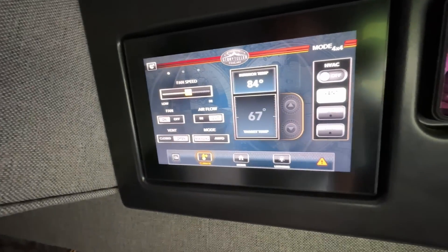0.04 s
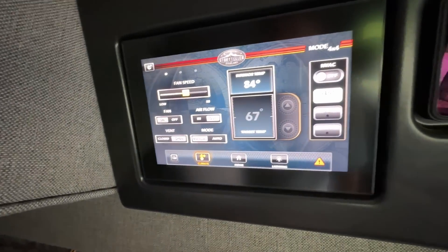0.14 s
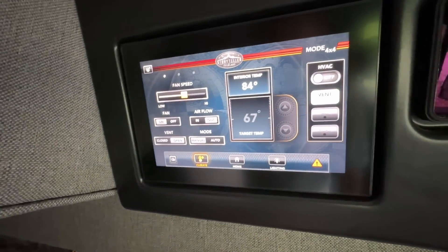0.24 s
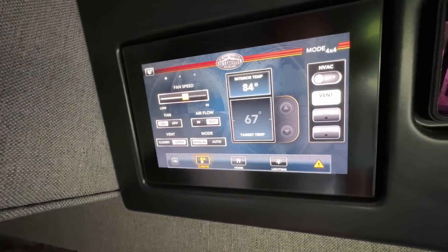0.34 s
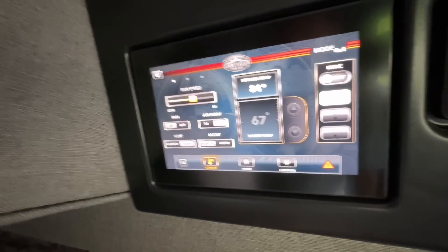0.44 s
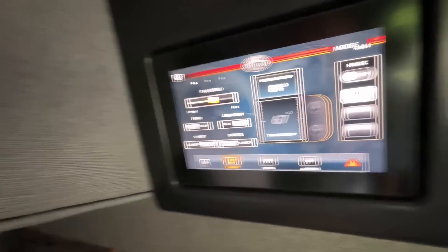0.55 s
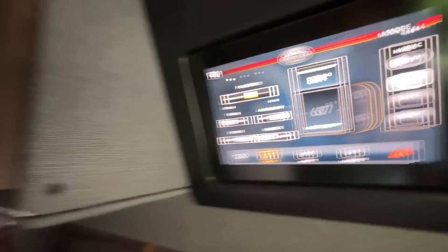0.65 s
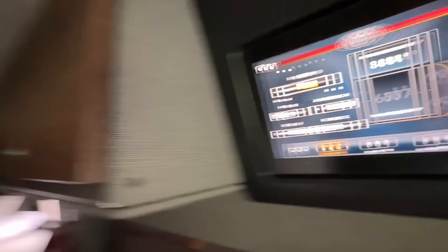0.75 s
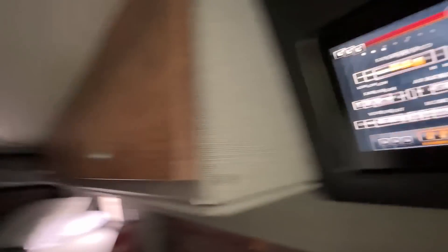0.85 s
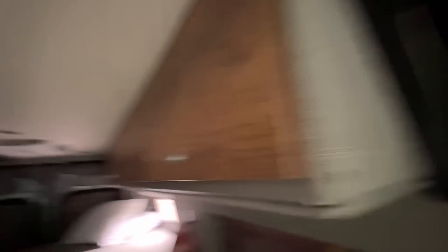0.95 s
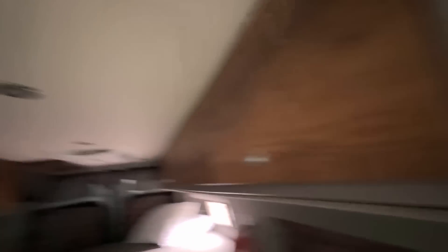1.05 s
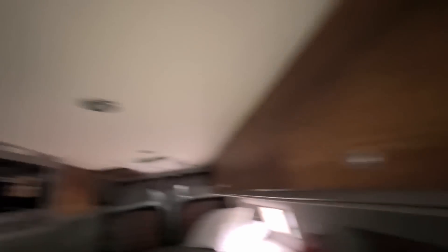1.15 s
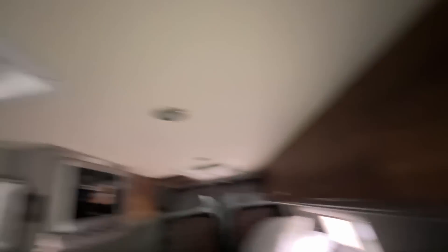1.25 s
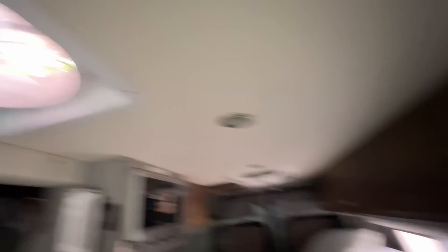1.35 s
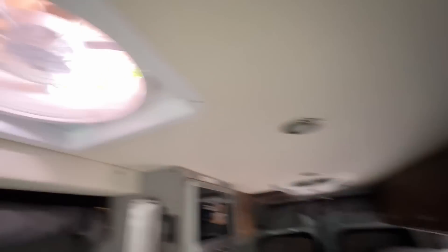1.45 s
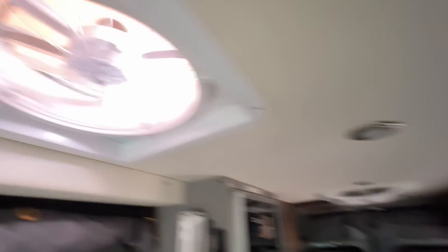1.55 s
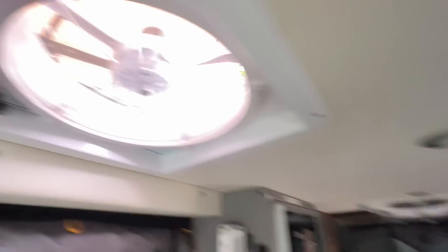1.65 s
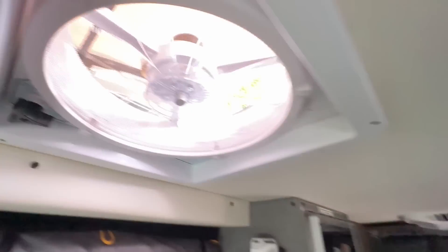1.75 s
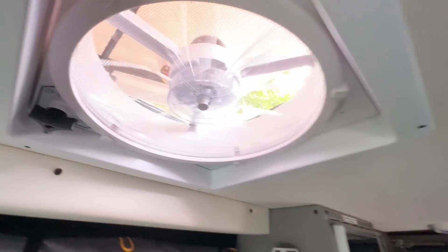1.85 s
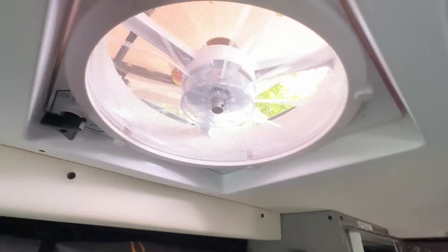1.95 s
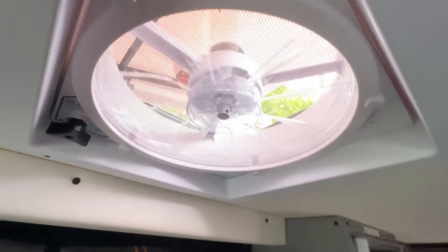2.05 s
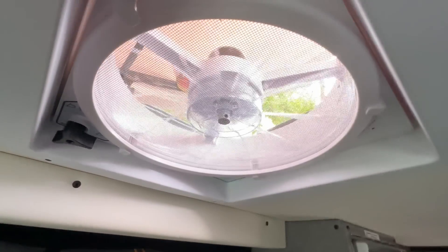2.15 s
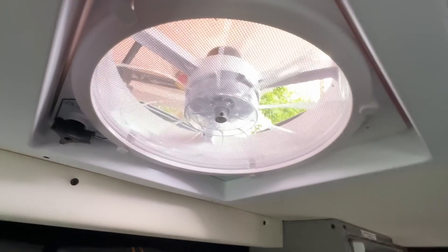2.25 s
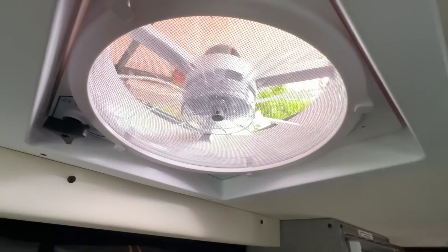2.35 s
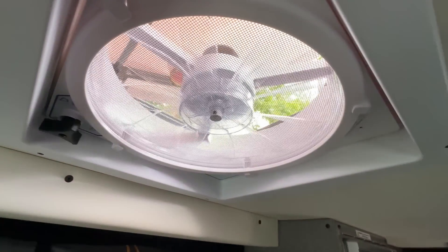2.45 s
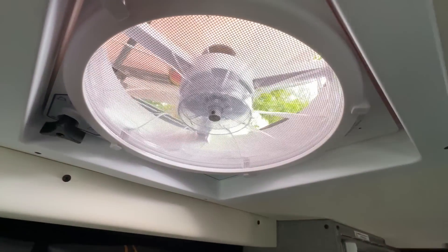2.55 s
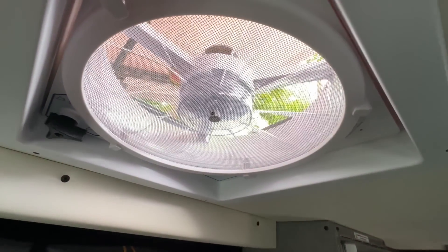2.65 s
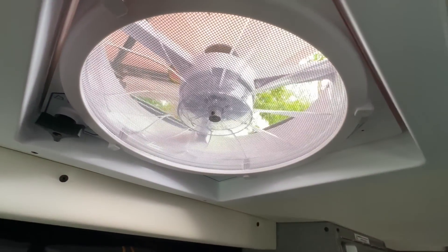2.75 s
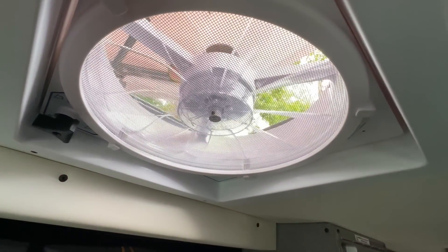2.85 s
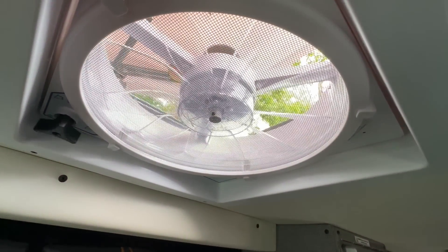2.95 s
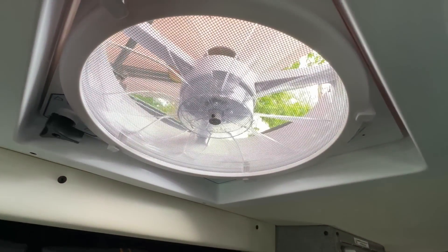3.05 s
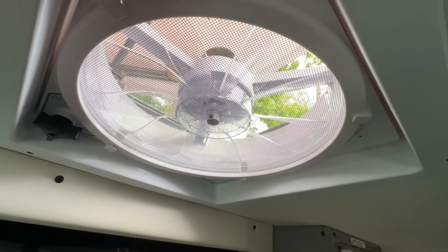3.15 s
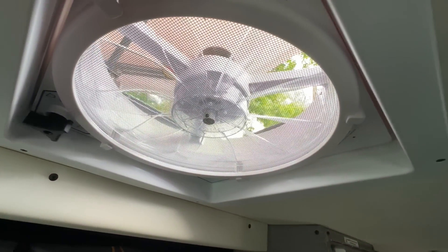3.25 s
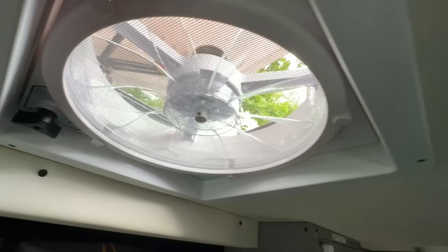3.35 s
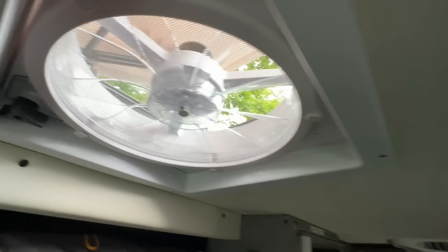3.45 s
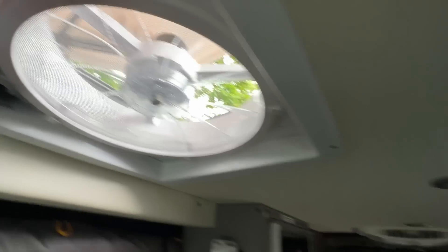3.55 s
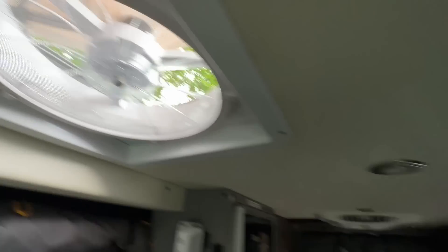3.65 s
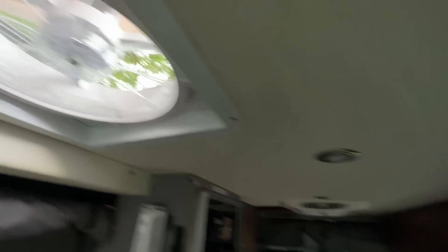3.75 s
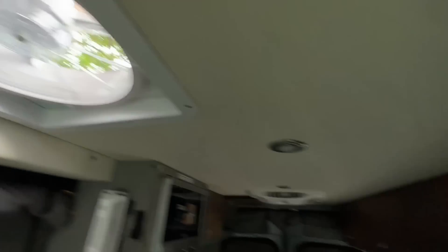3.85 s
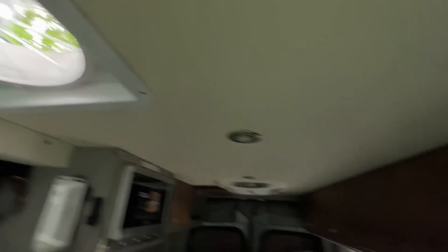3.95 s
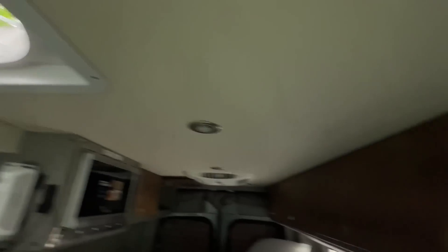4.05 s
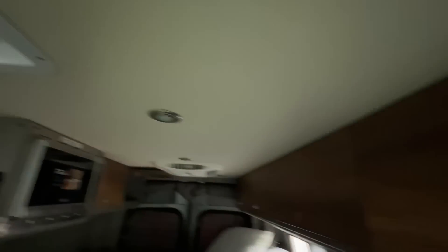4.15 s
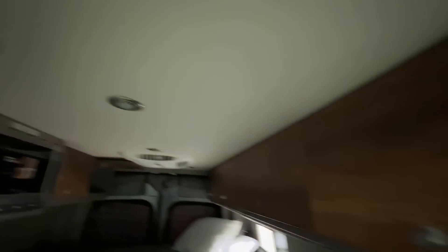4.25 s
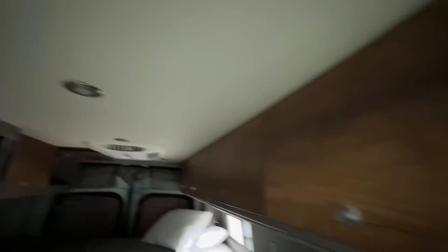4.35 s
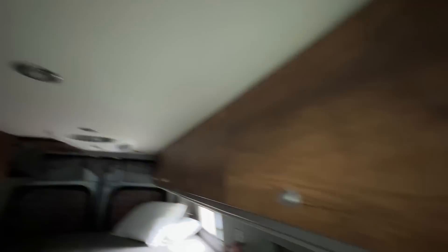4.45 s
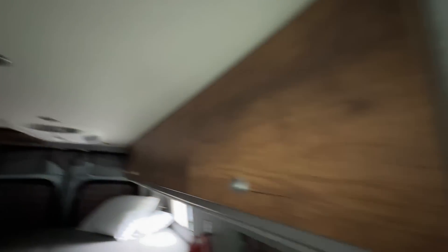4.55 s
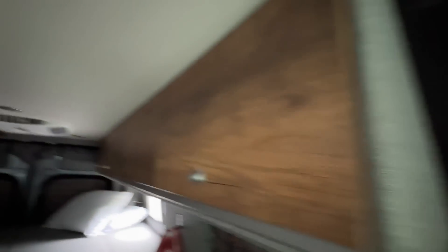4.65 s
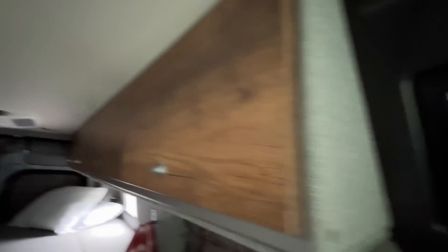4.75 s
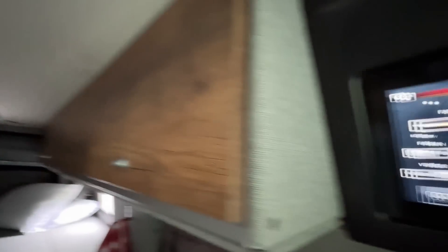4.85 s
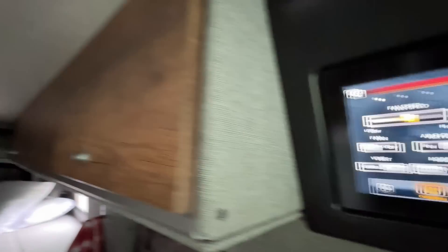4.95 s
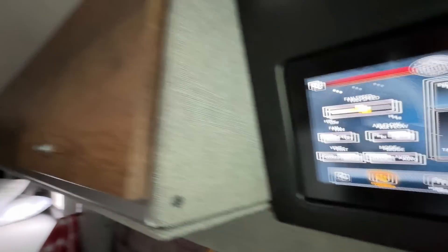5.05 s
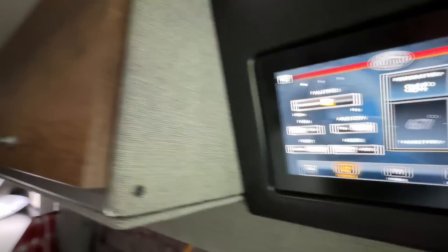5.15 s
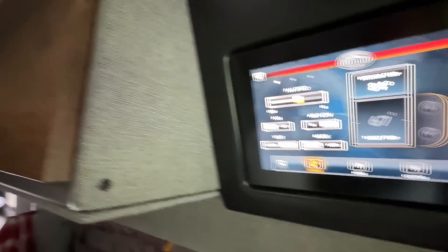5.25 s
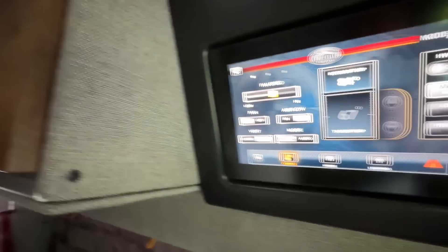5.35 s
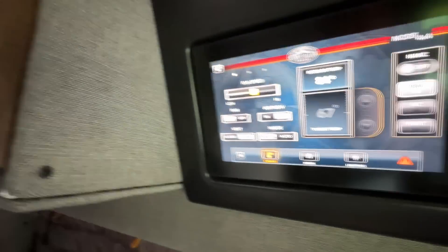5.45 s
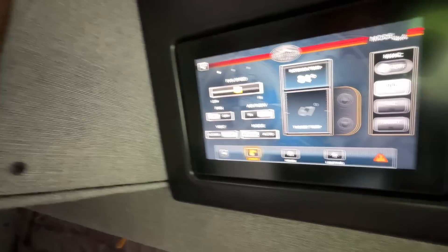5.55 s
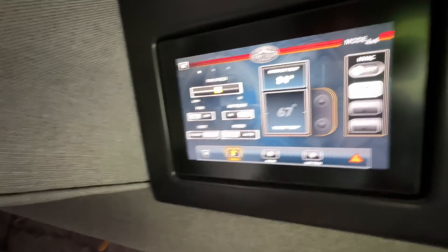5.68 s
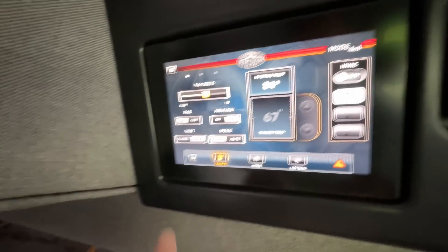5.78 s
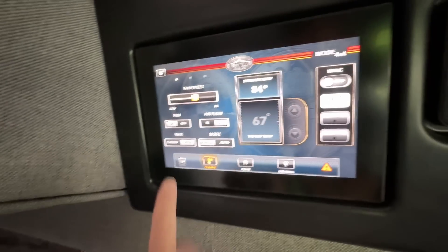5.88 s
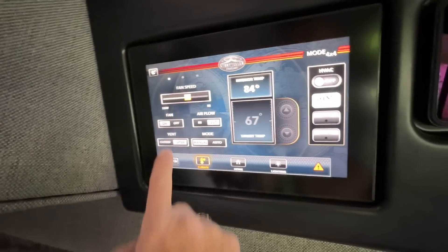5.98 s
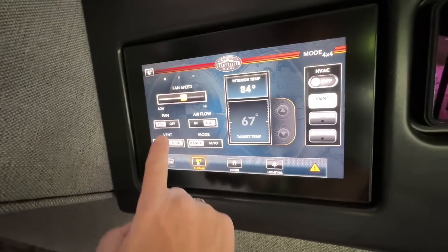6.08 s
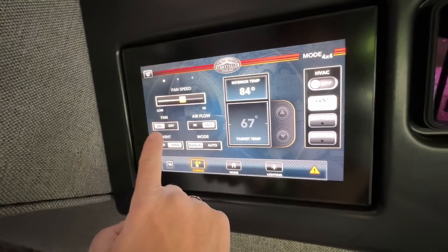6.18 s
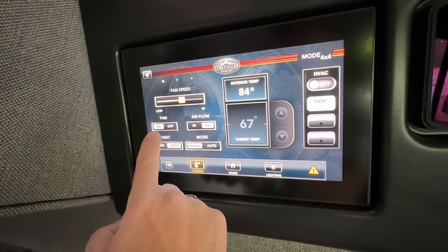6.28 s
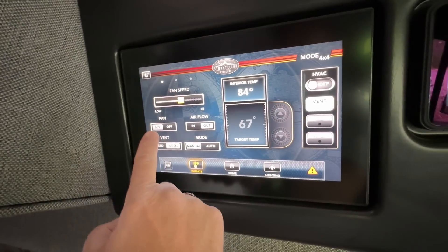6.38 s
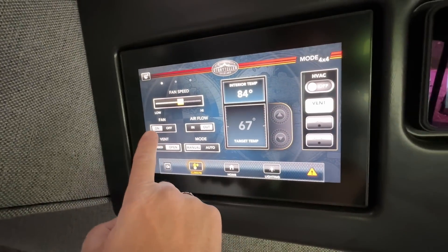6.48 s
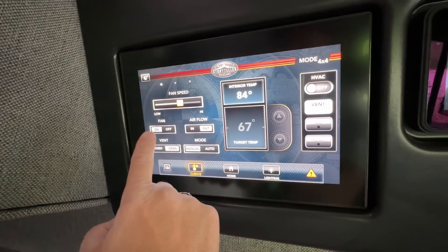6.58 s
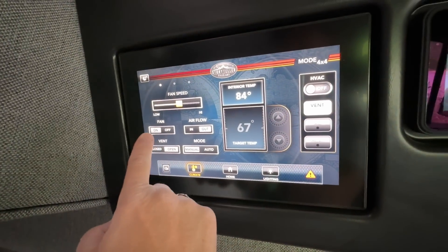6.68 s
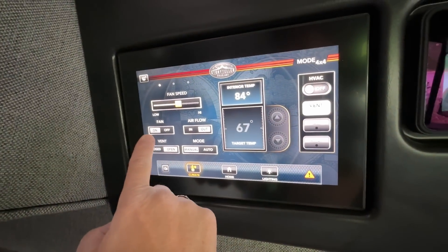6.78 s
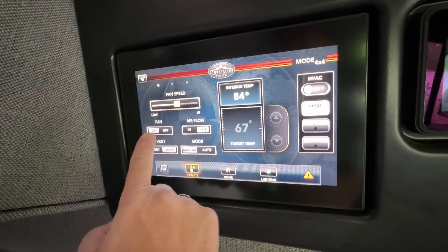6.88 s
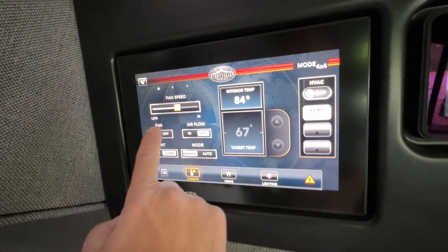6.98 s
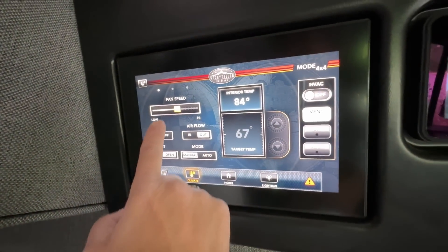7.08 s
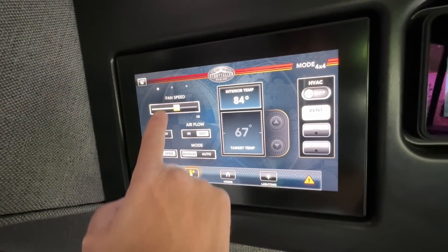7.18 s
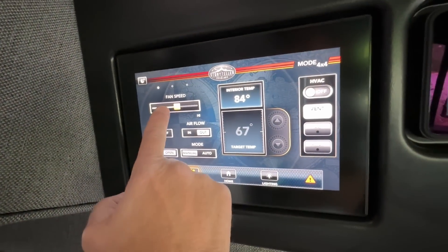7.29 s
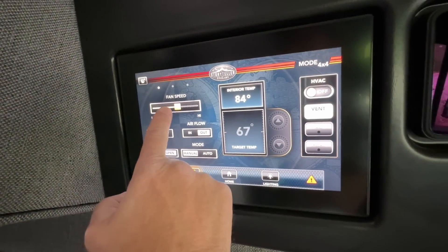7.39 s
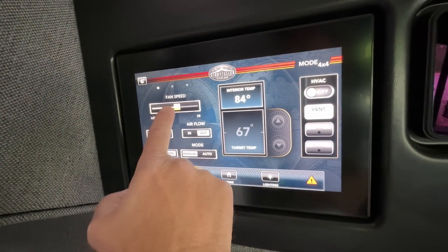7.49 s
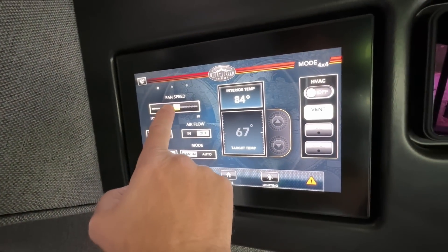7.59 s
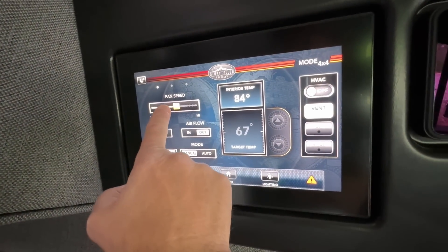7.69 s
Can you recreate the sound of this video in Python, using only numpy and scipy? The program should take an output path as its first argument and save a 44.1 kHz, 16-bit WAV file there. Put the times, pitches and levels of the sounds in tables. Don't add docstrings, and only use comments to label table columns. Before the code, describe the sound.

A steady motor whine around 1.25 kilohertz, with rough brush and gear noise in a plastic housing, plays over soft low cabin rumble. It is thin at first, fuller after half a second, strongest from about 1.5 to 3.5 seconds close to the vent, then duller. After 6.6 seconds it runs down with a descending whine, light chatter and small handling sounds.

```python
import sys
import numpy as np
from scipy import signal
from scipy.fft import rfft, irfft, next_fast_len
from scipy.io import wavfile
from scipy.ndimage import uniform_filter1d

SR = 44100
rng = np.random.default_rng(int(sys.argv[2]) if len(sys.argv) > 2 else 0)


def volts_from_decibels(level):
    exponent = np.asarray(level, float) / 20
    return 10 ** exponent


def materialize(psi):
    bounded = np.clip(np.atleast_2d(psi).T, -1, 1)
    quanta = np.round(bounded * 32767).astype(np.int16)
    wavfile.write(sys.argv[1], SR, quanta)


N = 340578
STEP = 32
SLOTS = 12
SWITCH_OFF_S = 6.642
LEFT_RIGHT = np.array([[1], [-1]])

# t/s, left lags right/ms, direct share/0-1, left-right level/dB
AIM = [(0, -0.28, 0.15, -7.5), (.8, -0.4, 0.39, -11.5), (1.154, -0.34, 0.06, -6), (1.497, 0.3, 0.45, -14),
       (1.701, 0.38, 0.28, -19), (3.55, 0.44, 0.25, -16), (3.749, 0.24, 0.1, -10), (4.0, -0.44, 0.12, -13),
       (4.151, -0.39, 0.1, -7), (5.2, -0.32, 0.18, -10.5), (6.499, -.28, 0.11, -11.5),
       (6.849, -0.29, 0.1, -10.5), (7.2, -0.29, 0.12, -15), (7.72, -0.26, 0.02, -14)]
# start/s, end/s
BASS_OPENS_S = (0.49, 0.78)
# f/Hz, level/dB
TREBLE_RESPONSE = [(20, 0), (7500, 0), (8300, -3), (9000, -9), (9400, -24), (9800, -9), (12300, 0),
                   (12600, -55), (13700, -55), (14000, -14), (14600, -1), (15150, -1), (15500, -12),
                   (15900, -45), (21000, -60)]
# f/Hz, width/Hz, level at the wall/dB, level facing the vent/dB
LEFT_COLOUR = [(550, 160, 1.5, -3), (1660, 200, 0, -1), (2000, 380, 0.5, -0.5), (2490, 410, 1.5, 4),
               (3310, 130, 0.5, 7.5), (4140, 600, -5.5, -6), (4940, 770, -3, -0.5), (6900, 640, 0.5, -0.5),
               (7650, 730, 2.5, 2)]
RIGHT_COLOUR = [(726, 470, 1, -4), (1630, 260, 4, 2), (1900, 410, 0.5, -4.5), (2310, 350, 1, 1),
                (3220, 500, 0, -2), (4390, 270, -3.5, 1), (5260, 660, 2.5, -3.5), (6070, 400, -1, -1),
                (7050, 250, 1, -0.5), (8100, 1200, -4.5, -4.5)]
# t/s, length/s, f/Hz, width/Hz, level/dB
BAND_PATCHES = [(.25, .3, 1700, 500, -1), (.95, 0.16, 3450, 300, -1), (1.07, .25, 1840, 500, -6),
                (2.4, 0.36, 1920, 270, -6), (4.4, .4, 4500, 180, -10), (4.7, 0.17, 1770, 350, -7.5),
                (4.9, 0.084, 2100, 250, -4), (4.6, 0.34, 3500, 200, -2), (5.62, 0.19, 410, 250, -3.5),
                (7.3, 0.23, 2380, 220, -8), (7.45, 0.14, 4900, 1380, -8), (3.3, 0.091, 11000, 1200, 0),
                (4.6, .3, 1600, 130, 2.5), (1.02, 0.51, 474, 130, 10), (3.76, .4, 350, 200, 5.5),
                (6.7, .12, 5900, 1330, -1.5), (7.6, 0.23, 5100, 2500, -4), (5.3, 0.093, 3800, 300, -4),
                (1.55, 0.14, 1600, 260, 0), (7.25, 0.09, 860, 210, -7), (3.94, 0.31, 780, 200, -6.5),
                (5.26, 0.24, 520, 180, 5.5), (1.04, 0.17, 1450, 250, -2), (2.67, .75, 640, 58, -4),
                (5.9, .15, 560, 120, -7), (4.2, .5, 3150, 250, -2.5), (7.5, 0.23, 1460, 450, -4),
                (4.15, .12, 1500, 220, 2)]

# f/Hz, level/(dB per Hz)
RUMBLE_COLOUR = [(44, -57), (75, 4), (113, 2), (188, 4), (296, -7.5), (334, -8), (373, -21), (520, -20.5),
                 (650, -33), (1100, -120)]
# t/s, f/Hz, level/dB
BOOM = [(0, 65.2, -51), (.62, 65.1, -61), (.88, 66, -50.5), (1.22, 63.7, -48), (1.45, 62.8, -74),
        (1.76, 62.8, -52), (2.45, 62.25, -50.5), (4.4, 63.5, -58), (6.69, 74.2, -50), (6.94, 72.7, -57.5),
        (7.14, 74.5, -48.5), (7.72, 66.2, -61.5)]
# t/s, length/s, level/dB
GRIP_THUMP = (7.14, .12, -53)
# f/Hz, level/(dB per Hz)
HISS_COLOUR = [(7500, -10), (10300, -15.5), (12000, -16), (16000, -19)]
# low/Hz, high/Hz
HISS_BANDS_HZ = [(6500, 9500), (9500, 11200), (11200, 13500), (13500, 16400)]
# t/s, level/dB, rise/s, fall/s, left-right level/dB
RUSTLES = [
    (1.055, -45, 0.013, 0.023, 3.5),
    (7.704, -44.5, 0.00036, 0.0018, -11),
    (7.715, -62, .004, .01, -7),
]
# t/s, level/dB, rise/s, fall/s, left-right level/dB
FINGER_TAP = (7.098, -55, 0.0024, 0.016, 0.5)

# t/s, level/dB
RATTLE_LEVEL = [
    (6.6, -85.5),
    (6.85, -50.5),
    (7.3, -58),
    (7.6, -83),
]
# f/Hz, width/Hz, level/dB
RATTLE_MODES = [(1070, 130, -5), (3000, 420, 0)]
# f/Hz, width/Hz,
# level/dB
HOUSING = [(666, 51, 0.5), (873, 74, -0.5), (1127, 50, 9.5), (1280, 110, 11), (1493, 280, 2.5),
           (1740, 160, -3.5), (2502, 230, 4), (3053, 210, 6), (3809, 114, 14.5), (4710, 310, 13),
           (5300, 750, -15.5), (6070, 490, 9.5), (6840, 420, -8), (6426, 270, 9.5), (7200, 530, -3),
           (1155, 30, 5.5), (1770, 50, -2), (2774, 23, 4.5), (2912, 45, 9.5), (3026, 30, 9.5),
         (3700, 33, 12.5), (4576, 34, 8), (4750, 38, 7)]
# t/s, level/dB
LOUDNESS = [(0.2, -46), (0.25, -43.5), (0.7, -48), (0.75, -44.5), (1.17, -46.5), (1.67, -39.5), (3.54, -38),
            (3.6, -43), (3.88, -43.5), (4.04, -47.5), (4.87, -43.5), (4.94, -46.5), (6.06, -45.5),
            (6.42, -48.5), (6.65, -51)]
# low/Hz, high/Hz
GRIND_BANDS_HZ = [(280, 900), (900, 2400), (2400, 4100), (4100, 9000)]
# level at the wall/dB, loudness share, facing vent/dB, in the aisle/dB, at rest/dB
GRIND_RULES = [(-62, 0.12, 7.5, 13, -23.5), (-51.5, 0.17, 5.5, 1.5, -25), (-48.5, 0.24, 2, -3, -43),
               (-49.5, 1, 0, 6, -38)]
LEAN_SHARES = (.25, .1, .5, 1.0)
# t/s, length/s, level/dB
LOW_PATCHES = [(0.538, 0.35, -13.5), (4.764, 0.067, -1.5), (5.788, 0.16, -4), (6.797, 0.079, -12.5),
               (1.41, 0.066, -6.5), (2.74, 0.67, 2), (3.868, 0.042, -5)]
# t/s, length/s, level/dB
MID_PATCHES = [(1.2, 0.059, 5), (0.61, 0.35, -1), (1.395, 0.059, -6), (2.148, 0.13, 3), (3.815, .15, -5),
               (4.119, 0.11, 3), (6.84, 0.13, -9.5)]

# t/s, f/Hz
SLOT_PITCH = [(.12, 1246), (.43, 1285), (.68, 1288), (.88, 1260), (1.36, 1254), (1.92, 1319), (2.1, 1297),
              (2.5, 1269), (2.86, 1286), (3.14, 1320), (3.66, 1243), (4.07, 1234), (4.4, 1283),
              (4.64, 1298), (4.95, 1256), (5.25, 1244), (5.9, 1305), (6.45, 1238)]
# multiple of shaft speed, level/dB
ORDERS = [(5, -76.5), (6, -63), (7, -73.5), (8, -59.5), (9, -68), (10, -56.5), (11, -45.5), (13, -55.5),
          (14, -61), (15, -60.5), (17, -61.5), (20, -59), (22, -65.5), (23, -55.5), (25, -63.5),
          (26, -76.5), (27, -60), (28, -60.5), (29, -67), (30, -54), (31, -61.5), (32, -53), (33, -68),
          (34, -61.5), (35, -57), (37, -48), (42, -56.5), (43, -54.5), (44, -53), (45, -57), (46, -58),
          (47, -57.5), (48, -52), (58, -62.5), (60, -50.5)]
# multiple, t/s, length/s, gain/dB
ORDER_SWELLS = [(6, 2.95, 0.33, 5.5), (6, 0.49, 1, -9), (6, 2.3, 0.044, -12), (6, 3.1, 0.17, 1),
                (6, 6.6, 0.29, -10), (6, 6.5, .2, 4), (7, 2.64, 0.15, 11), (7, 3.7, 0.31, 16),
                (8, 2.67, 0.28, 6), (8, 3.1, 0.11, -0.5), (8, 4.6, 0.11, 6), (8, 6.7, .1, 4),
                (10, 2.4, 0.31, -7), (10, 4.4, 0.93, -10), (10, 5.8, 0.29, 16.5), (11, 0.86, 0.23, 14.5),
                (11, 2.75, 0.99, -18), (11, 3.54, .12, -3), (11, 4.9, 0.092, 7.5), (11, 1.1, 0.13, -8),
                (11, 5.1, 0.1, 2), (11, 5.1, .15, 0), (11, 5.48, 0.24, 7), (48, 3.76, 0.12, 6)]
# level at the wall/dB, gain facing the vent/dB, level on run-down/dB
SLOT_RULES = [(-52.5, 10.5, -42.5), (-57, 9.5, -42.5), (-49.5, 4.5, -40), (-69.5, 11, -51.5)]
# t/s, length/s, peak level/dB
SWELLS_1ST = [(1.22, 0.04, -50), (2.36, 0.16, -38.5), (3.85, 0.2, -45.5), (.45, 0.1, -37.5),
              (.63, 0.11, -36), (1.65, 0.065, -33), (2.1, 0.22, -67), (2.7, 0.19, -35.5), (3.15, 0.14, -39),
              (4.45, 0.073, -53), (4.68, 0.13, -48), (4.02, 0.1, -58), (5.6, 0.068, -39), (5.85, 0.36, -54),
              (6.07, 0.14, -39.5), (5.3, .12, -58), (6.62, 0.047, -61)]
SWELLS_2ND = [(0.352, 0.31, -48), (2.15, 0.18, -49), (1.85, 0.088, -53), (2.7, 0.14, -52),
              (4.37, 0.056, -47), (4.57, 0.067, -55.5), (4.76, 0.047, -54), (5.3, 0.087, -47.5),
              (5.62, 0.036, -67), (6.02, 0.045, -43.5), (6.18, 0.15, -47.5)]
SWELLS_3RD = [(.05, 0.21, -46), (.45, 0.23, -42), (1.45, 0.3, -40.5), (1.9, 0.25, -37.5),
              (2.172, 0.15, -65), (3.15, 0.19, -55), (3.47, 0.047, -36.5), (3.87, 0.058, -34),
              (1.1, 0.039, -55), (4.05, 0.05, -43), (4.162, 0.041, -41), (4.3, 0.032, -43),
              (5.88, 0.1, -38), (4.45, 0.053, -40.5), (4.77, 0.07, -40), (5.631, 0.082, -42),
              (6.08, 0.15, -42)]
SWELLS_4TH = [(1.45, 0.06, -49), (3.15, .07, -52), (3.85, .09, -47), (4.6, .1, -51)]
# harmonic, t/s, length/s, gain/dB
GAPS = [(1, 0.94, 0.078, -11), (1, 3.8, 0.041, 2), (1, 3.5, 0.024, 7), (1, 1.85, 0.07, -1.5),
        (1, 4.2, 0.11, -14), (1, 5.27, 0.29, -7), (1, 5.3, 0.058, -12.5), (2, 3.7, 0.24, -5),
        (2, 5.78, 0.13, -9), (2, 3.14, 0.17, -4), (3, 0.713, 0.055, -11), (3, 0.88, .03, -15),
        (3, 1.16, 0.031, -11), (3, 1, 0.014, -6), (3, 1.2, 0.019, -5), (3, 3.9, .08, -3),
        (3, 4.36, .02, -10), (3, 4.2, .04, -4), (3, 5.9, 0.086, -5), (3, 6.5, 0.085, -6),
        (1, 6.17, 0.036, -6.5), (3, 6.77, 0.049, 4.5), (2, 6.87, 0.027, -3), (2, 7.09, 0.034, 8),
        (3, 7.05, 0.026, 4), (1, 7.01, 0.036, 4.5), (3, 7.9, .03, 6), (1, 6.66, 0.033, 2.5),
        (4, 6.92, .03, 4.5), (4, 7.16, 0.033, 10), (3, 7.28, .03, 5.5), (3, 4.1, .12, 2),
        (3, 0.54, 0.16, 1), (4, 3.1, .1, -3), (3, 2.84, 0.12, -8), (3, 3.9, 0.034, -2),
        (3, 4.7, 0.0076, -18), (3, 3.3, 0.023, -13), (3, 7.5, 0.018, -13), (3, 5.3, 0.16, -9)]
# f/Hz, width/Hz, level/dB
COAST_MODES = [(673, 38, -3), (825, 68, -7), (1064, 82, -2.5), (1230, 35, -5), (1550, 38, -16),
               (1790, 95, -6.5), (2105, 74, -2), (2560, 46, -5), (3040, 216, 6), (3780, 80, 2),
               (4600, 150, -12)]
LEAD_LATE_S = (0.35, 0.17, 0.057, .05)


def rms_one(x):
    return x / np.sqrt(np.mean(x ** 2) + 1e-20)


def in_time(rows):
    s, *columns = np.transpose(rows)
    return [np.interp(np.arange(N) / SR, s, c) for c in columns]


def coarse_drift(rate_hz):
    r = np.exp(-2 * np.pi * STEP * rate_hz / SR)
    noise = rng.standard_normal(N // STEP + 3001)
    return rms_one(signal.lfilter([1], [1, -2 * r, r * r], noise)[3000:])


def fine(x):
    return np.interp(np.arange(min(N, len(x) * STEP)) / STEP, np.arange(len(x)), x)


def bell(s, length_s):
    distance = np.abs(np.arange(0, N, STEP) / SR - s) / length_s
    return np.exp(-np.minimum(distance, 9) ** 2)


def band(x, low_hz, high_hz, order=2):
    return signal.sosfilt(signal.butter(order, [low_hz, high_hz], "band", fs=SR, output="sos"), x)


def spectrum(points):
    hz, db = np.transpose(points)
    return lambda f: volts_from_decibels(np.interp(np.log(f), np.log(hz), db, -90, -90))


def coloured(gain):
    size = next_fast_len(N)
    hz = np.arange(size // 2 + 1) * SR / size
    return irfft(rfft(rng.standard_normal((2, size))) * gain(hz + 1), size)[:, :N]


def standing_waves(width_hz, depth_db):
    r = np.exp(-1 / width_hz)
    noise = rng.standard_normal(SR // 2 + 500)
    ripple = rms_one(signal.lfilter([1], [1, -2 * r, r * r], noise)[500:])
    return lambda hz: volts_from_decibels(depth_db * np.interp(hz, np.arange(len(ripple)), ripple))


def spaced(pair, closeness=0.4):
    lag_ms, share, _ = in_time(AIM)
    share = np.clip(share, 0, 1) ** closeness
    shared = (pair[0] + pair[1][::-1]) / np.sqrt(2)
    late = np.interp(np.arange(N) - np.round(lag_ms * SR / 1000), np.arange(N), shared)
    direct = np.array([late, shared])
    return np.sqrt(share) * direct + np.sqrt(1 - share) * pair[:, ::-1] * LEFT_RIGHT


def facing():
    lag_ms = in_time(np.array(AIM)[:, :2])[0]
    return np.clip((lag_ms + .25) / .65, 0, 1)


def speed():
    coast_s, friction_hz = 1.12, 800
    since = np.arange(N) / SR - SWITCH_OFF_S
    falling = (SLOT_PITCH[-1][1] + friction_hz) * np.exp(-since / coast_s) - friction_hz
    pitch = np.minimum(in_time(SLOT_PITCH)[0], falling)
    return uniform_filter1d(np.clip(pitch, 20, None), size=SR // 16)


def coasting(pitch):
    return np.clip((1225 - pitch) / 60, 0, 1)


def slowed(pitch):
    return np.clip(1 - pitch / SLOT_PITCH[-1][1], 0, 1) ** 2.17


def noise_floor():
    return volts_from_decibels(-79) * rms_one(band(rng.standard_normal((2, N)), 330, 3300, order=1))


def cabin():
    boom_hz, boom_db = in_time(BOOM)
    rumble_db = -55 + 3 * facing() + 1.1 * fine(coarse_drift(3.1))
    deep_db = -64.5 - 31 * facing() + .6 * (boom_db - np.median(boom_db))

    mid, side = [fine(coarse_drift(7.6) + 1j * coarse_drift(22) + steady) for steady in (1.3, 0)]
    swell = mid + volts_from_decibels(-27) * side * LEFT_RIGHT
    boom = rms_one(np.real(swell * np.exp(2j * np.pi * np.cumsum(boom_hz) / SR)))

    modes = standing_waves(width_hz=2.9, depth_db=1.0)
    mid, side = coloured(lambda hz: spectrum(RUMBLE_COLOUR)(hz) * modes(hz))
    rumble = rms_one(mid) + volts_from_decibels(-10.0) * rms_one(side) * LEFT_RIGHT

    mid, side = band(rng.standard_normal((2, N)), 28, 57, order=3)
    deep = rms_one(mid + volts_from_decibels(-3.5) * side * LEFT_RIGHT)
    thump_s, thump_length_s, thump_db = GRIP_THUMP
    thump = volts_from_decibels(thump_db) * fine(bell(thump_s, thump_length_s))
    return volts_from_decibels(boom_db) * boom + volts_from_decibels(rumble_db) * rumble + (volts_from_decibels(deep_db) + thump) * deep


def bright_hiss(pitch):
    hiss = spaced(rms_one(coloured(spectrum(HISS_COLOUR))), closeness=0.3)
    hiss = sum(band(hiss, *edges) * fine(volts_from_decibels(2.5 * coarse_drift(11))) for edges in HISS_BANDS_HZ)
    vent = volts_from_decibels(-90 + 38.5 * facing() ** 0.45)
    motor = volts_from_decibels(-73 - 10.0 * slowed(pitch))
    return (vent + motor) * hiss


def rustles():
    t = np.arange(N) / SR
    bursts = []
    for s, db, rise_s, fall_s, lean_db in RUSTLES + [FINGER_TAP]:
        shape = np.exp(-np.where(t < s, ((s - t) / rise_s) ** 2, (t - s) / fall_s))
        bursts.append(volts_from_decibels(db + lean_db * LEFT_RIGHT / 2) * shape)
    *brushes, tap = bursts
    brush = rms_one(band(rng.standard_normal((2, N)), 5200, 15800))
    brush = spaced(brush, closeness=0.18)
    return sum(brushes) * brush + tap * rms_one(band(brush, 4000, 9800))


def tinted(x, hz, width_hz, db):
    r = np.exp(-np.pi * width_hz / SR)
    poles = [1, -2 * r * np.cos(2 * np.pi * hz / SR), r * r]
    ring = signal.lfilter((1 - r * r) / 2 * np.array([1, 0, -1]), poles, x)
    return x + fine(volts_from_decibels(db) - 1)[:x.shape[-1]] * ring


def held(motor):
    aim, out = facing()[::STEP], []
    for x, colour in zip(motor, (LEFT_COLOUR, RIGHT_COLOUR)):
        for hz, width_hz, wall_db, vent_db in colour:
            x = tinted(x, hz, width_hz, wall_db + (vent_db - wall_db) * aim)
        out.append(x)
    out = np.array(out)
    for s, length_s, hz, width_hz, db in BAND_PATCHES:
        first = max(0, int((s - 2.5 * length_s) * SR / STEP))
        last = int((s + 2.5 * length_s) * SR / STEP)
        part = out[:, first * STEP:last * STEP]
        part[:] = tinted(part, hz, width_hz, db * bell(s, length_s)[first:last + 1])
    return out


def smeared(lines, pitch, t60_s=0.28):
    t = np.arange(SR // 3) / SR
    echoes = rng.standard_normal((2, len(t))) * volts_from_decibels(-60 * t / t60_s)
    echoes = echoes / np.sqrt(np.sum(echoes ** 2, axis=1, keepdims=True))
    wet = signal.fftconvolve(coasting(pitch) * lines, echoes, axes=1)[:, :N]
    return (1 - 0.4 * coasting(pitch)) * lines + volts_from_decibels(-6) * wet


def rattle(angle):
    def modes(f):
        return sum(volts_from_decibels(db) / (1 + (2 * (f - hz) / width_hz) ** 2) for hz, width_hz, db in RATTLE_MODES)

    ring = rms_one(spaced(coloured(modes)))
    return volts_from_decibels(in_time(RATTLE_LEVEL)[0]) * (1 + 0.3 * np.cos(angle / 2)) * ring


def housing_gain(hz, valley_db=-20):
    peaks = sum(volts_from_decibels(db) ** 2 / (1 + (2 * (hz - centre_hz) / width_hz) ** 2)
                for centre_hz, width_hz, db in HOUSING)
    return np.sqrt(peaks + volts_from_decibels(valley_db) ** 2)


def shaft_turns(pitch):
    flutter = 1 + 0.001468 * fine(coarse_drift(31.7))
    return 2 * np.pi * np.cumsum(pitch / SLOTS * flutter) / SR


def gear_beat(angle, depth):
    return 1 + depth * (np.cos(.262 * angle) + 0.78 * np.cos(.524 * angle + 4.7))


def grind_levels(pitch):
    loud_db, aim = in_time(LOUDNESS)[0], facing()
    loud_swing_db = loud_db - np.median(loud_db)
    aisle = np.clip(1 - in_time(AIM)[1] / 0.15, 0, 1)
    levels = [db + share * loud_swing_db + near_db * aim + aisle_db * aisle + rest_db * slowed(pitch)
              for db, share, near_db, aisle_db, rest_db in GRIND_RULES]
    for k, patches in enumerate((LOW_PATCHES, MID_PATCHES)):
        levels[k] = levels[k] + fine(sum(db * bell(s, length_s) for s, length_s, db in patches))
    return levels


def grind(angle, levels, leans):
    ripples = [standing_waves(width_hz=11.2, depth_db=4.5) for place in range(3)]
    wander = 2 * np.pi * np.arange(N) / SR / 3.1 + .8 * fine(coarse_drift(.5))
    grid_hz = np.arange(SR // 2)
    body = housing_gain(grid_hz)
    pair = 0
    for k, ripple in enumerate(ripples):
        noise = coloured(lambda hz: np.interp(hz, grid_hz, body) * ripple(hz))
        pair = pair + (1 + np.cos(wander + 2 * np.pi * k / 3)) * noise
    lows, highs = spaced(pair, closeness=0.44), spaced(pair)

    out, trims_db = 0, (6.64, 6.97, 7.75, 2.4)
    noises = (lows, highs, highs, highs)
    for db, trim_db, lean_db, edges, noise in zip(levels, trims_db, leans, GRIND_BANDS_HZ, noises):
        flicker_db = 0.95 * fine(coarse_drift(11.4))
        gain = volts_from_decibels(db + trim_db + flicker_db + lean_db * LEFT_RIGHT / 2)
        out = out + gain * rms_one(band(noise, *edges, order=3))
    throb = gear_beat(angle, depth=0.051) * (1 + 0.035 * np.cos(angle) + 0.1 * np.cos(2 * angle))
    return throb * out


def by_band(curves, hz):
    centres_hz = np.mean(GRIND_BANDS_HZ, axis=1)
    place = np.interp(np.log(hz), np.log(centres_hz), np.arange(4))
    return sum(max(0, 1 - abs(place - k)) * curve[::STEP] for k, curve in enumerate(curves))


def shaft_orders(angle, pitch, levels, leans):
    shaft_hz = pitch[::STEP] / SLOTS
    lag_s = in_time(AIM)[0][::STEP] / 1000
    count = len(shaft_hz)
    turn = np.exp(1j * np.resize(angle, (count, STEP))).astype(np.complex64)
    out = np.zeros((2, count, STEP))
    running = [db - np.median(db) for db in levels]
    ports = [standing_waves(width_hz=33.0, depth_db=2.5) for side in "LR"]
    unloaded_db = 3 * coasting(pitch[::STEP])
    carrier, reached = 1, 0
    for order, db in ORDERS:
        while reached < order:
            carrier, reached = carrier * turn, reached + 1
        hz = order * shaft_hz
        usual_hz = np.median(hz)
        swept = housing_gain(hz) / housing_gain(usual_hz)
        if order < 10:
            near_db = 1.4 * running[-1][::STEP] + 0.68 * running[0][::STEP] - 2.5
        else:
            near_db = .55 * by_band(running, usual_hz) + .4 * running[-1][::STEP]
        near_db = near_db + sum(rise_db * bell(s, length_s)
                                for k, s, length_s, rise_db in ORDER_SWELLS if k == order)
        gain = swept * volts_from_decibels(db + near_db + unloaded_db) * np.exp(1j * order ** 2)
        lean = volts_from_decibels(by_band(leans, usual_hz) / 2)
        steady = 1 / (1 + (order / 14.8) ** 2)
        rate_hz = 3.2 + 0.22 * order
        paths = (lean * np.exp(-2j * np.pi * hz * lag_s), 1 / lean)
        for side, path in enumerate(paths):
            scattered = (coarse_drift(rate_hz) + 1j * coarse_drift(rate_hz))[:count]
            mix = path * ports[side](hz) * (steady + 0.45 * (1.2 - steady) * scattered)
            out[side] += np.real((gain * mix).astype(np.complex64)[:, None] * carrier)
    return out.reshape(2, -1)[:, :N] * gear_beat(angle, depth=0.08)


def slot_levels(pitch):
    valley_db, fade_db = -18.5, -40
    out, aim, pitch = [], facing()[::STEP], pitch[::STEP]
    swells = (SWELLS_1ST, SWELLS_2ND, SWELLS_3RD, SWELLS_4TH)
    for k, ((db, near_db, coast_db), rows) in enumerate(zip(SLOT_RULES, swells), 1):
        driven = volts_from_decibels(db + near_db * aim)
        driven = driven + sum(volts_from_decibels(top_db) * bell(s, length_s) for s, length_s, top_db in rows)
        echo_db = sum(gap_db * bell(s, length_s) for which, s, length_s, gap_db in GAPS if which == k)
        lit = sum(volts_from_decibels(top_db) / (1 + ((k * pitch - hz) / width_hz) ** 4)
                  for hz, width_hz, top_db in COAST_MODES)
        free = (volts_from_decibels(valley_db) + lit) * volts_from_decibels(coast_db + fade_db * slowed(pitch))
        level = driven + coasting(pitch) * (free - driven)
        out.append(fine(20 * np.log10(level) + echo_db))
    return out


def slot_leads(pitch):
    t, lag_ms = np.arange(N) / SR, in_time(AIM)[0]
    return [-.4 - share * 2 * np.pi * k * pitch * np.interp(t - late_s, t, lag_ms) / 1000
            for k, (share, late_s) in enumerate(zip((.57, .95, .9, .9), LEAD_LATE_S), 1)]


def slot_whine(angle, pitch, levels, leads, leans):
    out, slow = 0, pitch[::STEP]
    harmonic_leans = (leans[1], leans[2], leans[2], leans[2])
    for k, (db, lead, lean_db) in enumerate(zip(levels, leads, harmonic_leans), 1):
        flicker_db = 1.3 * coarse_drift(8) + np.array([2.2 * coarse_drift(2.5) for side in "LR"])
        beads = np.array([standing_waves(width_hz=30.0, depth_db=2.0)(k * slow) for side in "LR"])
        flicker_db = flicker_db[:, :len(slow)] + coasting(slow) * 20 * np.log10(beads)
        level = volts_from_decibels(db[::STEP] + flicker_db + lean_db[::STEP] * LEFT_RIGHT / 2)
        jitter = 0.23 * fine(coarse_drift(23))
        phase = k * SLOTS * angle + lead * LEFT_RIGHT / 2 + jitter
        out = out + np.sqrt(2) * np.array([fine(side) for side in level]) * np.cos(phase)
    return out * gear_beat(angle, depth=0.12)


def scene():
    around = noise_floor() + cabin()
    pitch = speed()
    around = around + bright_hiss(pitch) + rustles()
    lean_db = in_time(AIM)[2]
    *levels, lean_db = uniform_filter1d(grind_levels(pitch) + [lean_db], size=SR // 6, axis=1)
    leans = [share * lean_db for share in LEAN_SHARES]
    angle = shaft_turns(pitch)
    lines = shaft_orders(angle, pitch, levels, leans)
    lines = lines + slot_whine(angle, pitch, slot_levels(pitch), slot_leads(pitch), leans)
    motor = rattle(angle) + grind(angle, levels, leans) + smeared(lines, pitch)
    return around + held(motor)


def roll_off(x):
    return signal.sosfilt(signal.butter(12, 16470, fs=SR, output="sos"), x)


def record(dry):
    cut = signal.sosfilt(signal.butter(5, 245, "high", fs=SR, output="sos"), dry)
    opened = np.interp(np.arange(N) / SR, BASS_OPENS_S, [0, 1])
    size = next_fast_len(N)
    hz = np.arange(size // 2 + 1) * SR / size
    ports = spectrum(TREBLE_RESPONSE)(np.clip(hz, 25, 20000))
    heard = irfft(rfft(cut + opened * (dry - cut), size) * ports, size)[:, :N]
    return roll_off(heard)


dry = scene()
out = record(dry)
materialize(out)
```